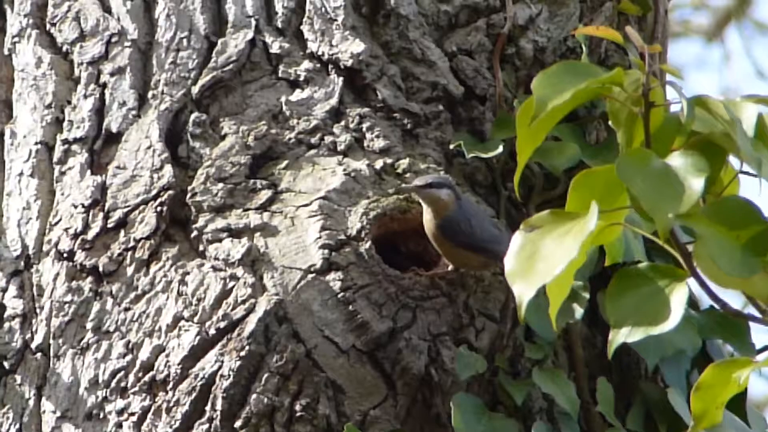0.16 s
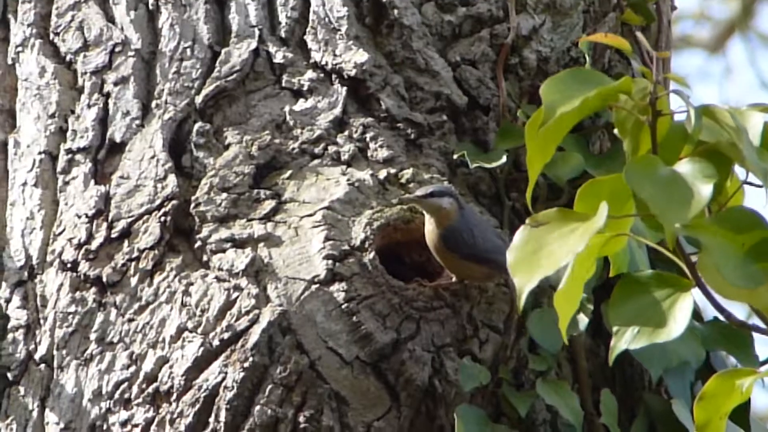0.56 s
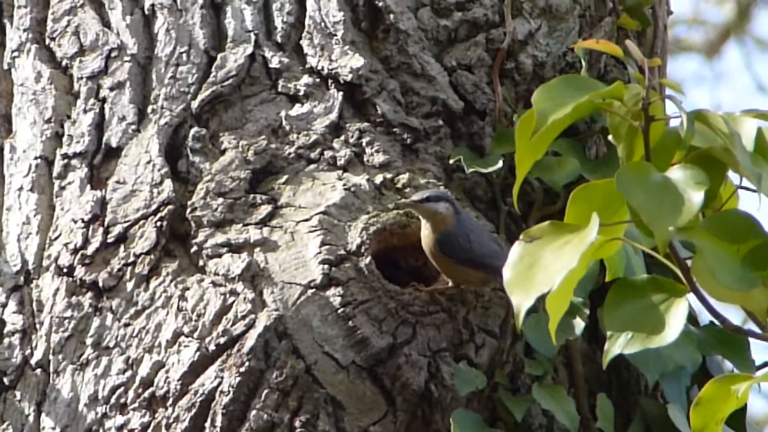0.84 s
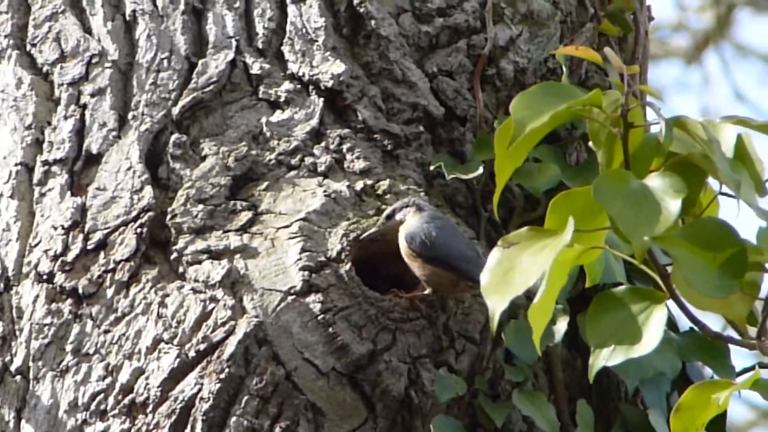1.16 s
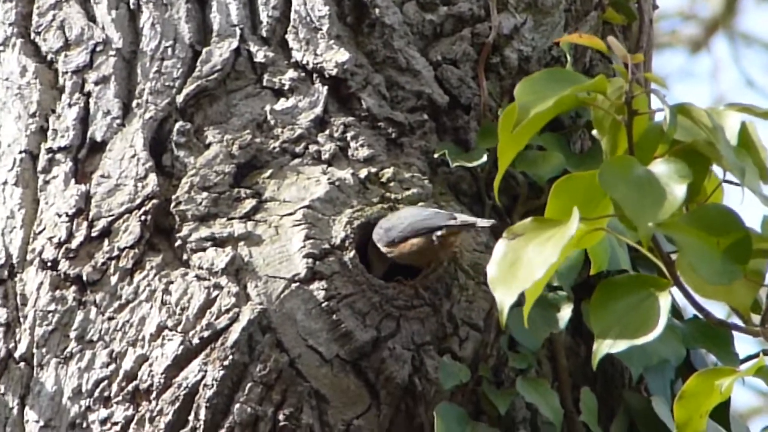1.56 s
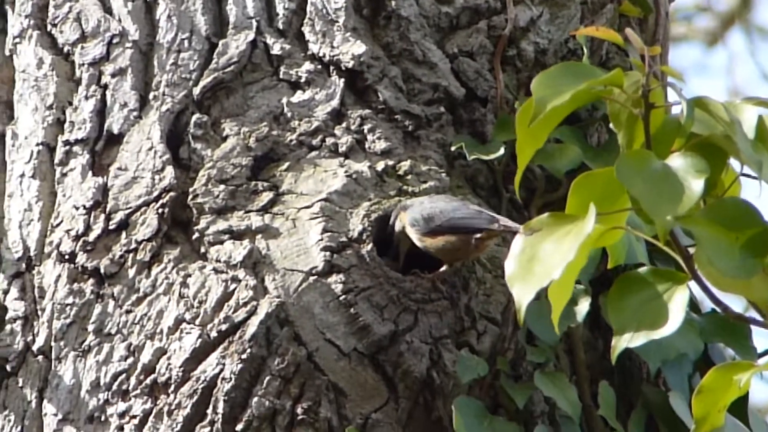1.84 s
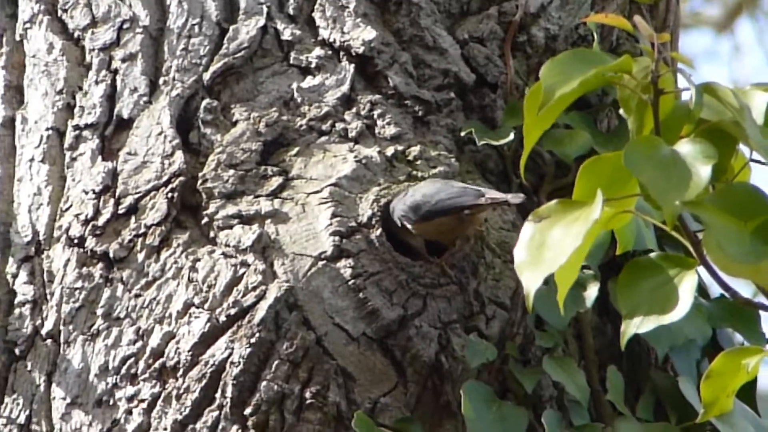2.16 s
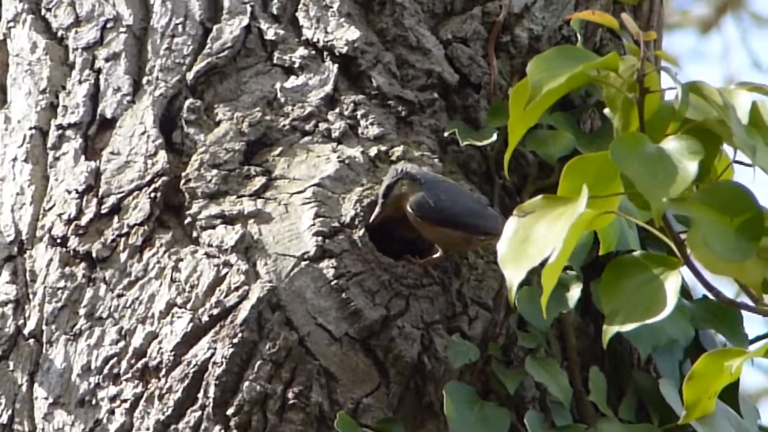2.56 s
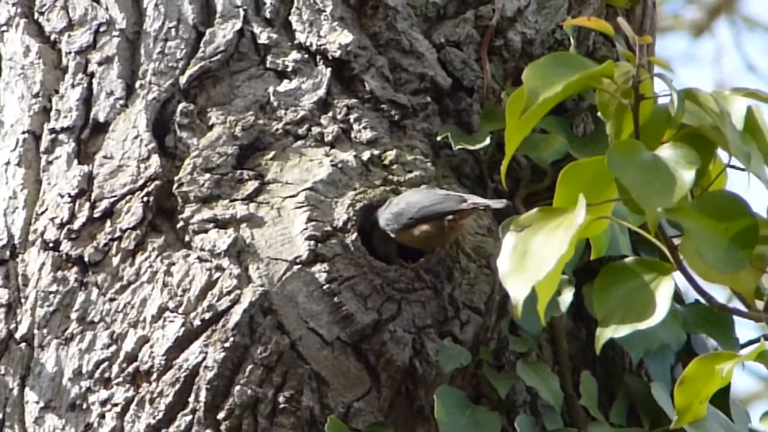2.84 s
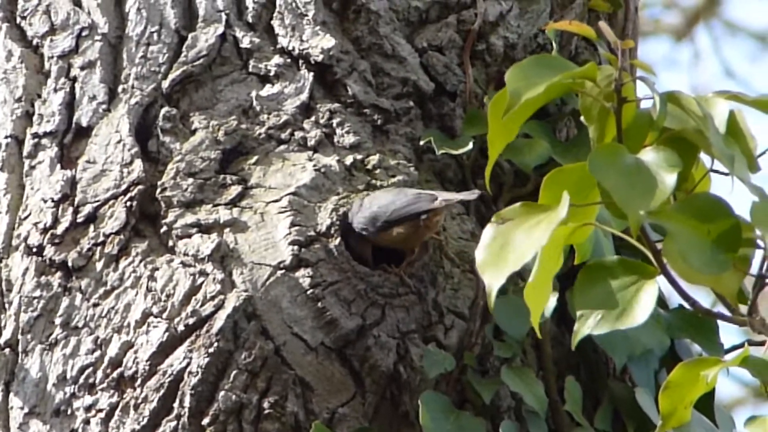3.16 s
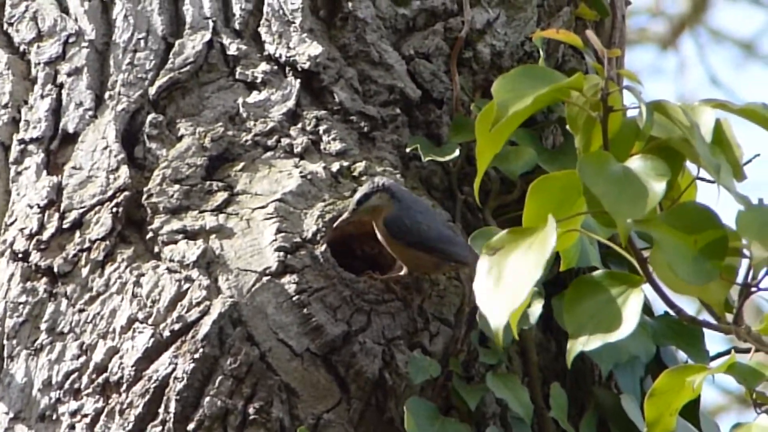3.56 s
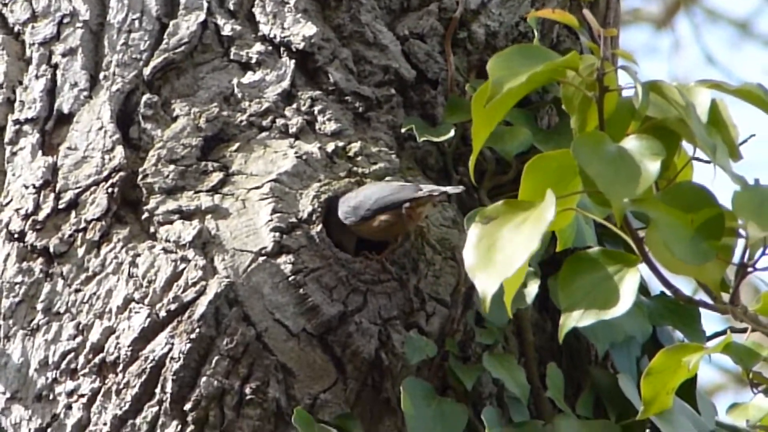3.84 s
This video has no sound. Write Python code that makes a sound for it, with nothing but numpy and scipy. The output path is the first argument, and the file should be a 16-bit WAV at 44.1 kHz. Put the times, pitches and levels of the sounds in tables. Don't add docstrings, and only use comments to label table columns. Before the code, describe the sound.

A small bird whistles clear repeated chirps among trees over steady distant road drone.

```python
import sys
import numpy as np
from scipy import signal
from scipy.fft import rfft, irfft, next_fast_len
from scipy.io import wavfile
from scipy.ndimage import uniform_filter1d, map_coordinates

SR = 44100
rng = np.random.default_rng(int(sys.argv[2]) if len(sys.argv) > 2 else 0)


def transcribe(u):
    v = np.clip(np.atleast_2d(u).T, -1, 1)
    q = np.round(v * 32767).astype(np.int16)
    wavfile.write(sys.argv[1], SR, q)


def invert_db(x):
    u = np.asarray(x, float) / 20
    return 10 ** u


N = 176400

# frequency in Hz, density in dB per Hz.
ENGINE_SPECTRUM = [(25, -58), (60, -27.5), (98, -11.5), (230, -9), (400, -3), (620, -10.5), (900, -7.5),
                   (1500, -120)]
TYRE_SPECTRUM = [(410, -24), (700, -4.5), (949, 4), (1070, -0.5), (1260, 1.5), (1780, 0), (2370, -5),
                 (2550, -11), (3000, -22.5), (3900, -19), (6600, -120)]
LEAF_SPECTRUM = [(1650, -32), (2800, -9.5), (3950, -1.5), (4830, -4), (5690, -9), (6620, -9),
                 (11000, -10.5), (14500, -27), (15500, -39)]
WIND_SPECTRUM = [(20, -22), (40, -12), (80, -2), (150, 0), (230, -27), (400, -120)]
# time in seconds, road level in dB, engines over it in dB.
ROAD_SWELL = [(.3, -32.5, 3), (.7, -32.5, 0), (1.3, -33.5, 2.5), (1.8, -33, 0.5), (2.3, -33.5, 1),
              (2.7, -34, 0), (3.1, -31, -1.5), (3.5, -33.5, 1.5), (4, -32, -1.5)]
# frequency in Hz, left over right in dB.
PORT_LEAN = [(40, 1), (110, 1.5), (200, 2.5), (380, 9), (700, 6), (2400, 4.5), (6000, 1.5), (15000, 1.6)]
# frequency in Hz, lead of the left in radians.
PORT_LEAD = [(40, 4), (130, 1.52), (260, 2.58), (500, 4.1), (860, 4.68), (2400, 7.26), (4000, 6.6),
             (15000, 5.55)]
# frequency in Hz, shared part from 0 to 1.
PORT_COHERENCE = [(30, .2), (60, .6), (150, .8), (300, .68), (600, .88), (2000, .85), (5000, .72),
                  (12000, .7)]

# start in seconds, level in dB.
TWIG_TICKS = [(2.3045, -20), (2.311, -25)]

# start in seconds, length in seconds, first Hz, last Hz, level in dB.
ANSWER_NOTES = [(3.418, .022, 6500, 4400, -32), (3.425, .075, 3500, 4150, -40),
                (3.538, .025, 6100, 3950, -29), (3.563, .039, 4020, 3900, -28),
                (3.576, .012, 4000, 3450, -33), (3.543, .02, 5620, 5540, -35),
                (3.602, .018, 5350, 4900, -31), (3.608, .024, 3750, 4020, -37),
                (3.643, .028, 4020, 3960, -35), (3.677, .045, 4300, 4280, -34),
                (3.735, .03, 4150, 4100, -40), (3.769, .031, 5300, 3720, -27),
                (3.786, .04, 4100, 3780, -30), (3.801, .018, 4050, 3350, -27),
                (3.819, .015, 3850, 3300, -30), (3.836, .02, 3950, 3800, -35),
                (3.885, .05, 4130, 4170, -33), (3.94, .02, 4100, 4000, -36), (3.962, .037, 4050, 4020, -36)]
# frequency in Hz, gain in dB.
FAR_PATH = [(3300, 0), (4000, 0), (4500, -5), (4950, -2), (5400, -4), (6500, -3)]
# delay in seconds, gain in dB.
TRUNK_ECHOES = [(.011, -10), (.024, -13), (.05, -16)]

# seconds from the note's time, pitch in Hz, effort in dB.
ARCH = [(-.026, 4300, -10), (-.011, 4620, -1), (0, 4950, 0), (.007, 5680, 0), (.015, 6100, -3),
        (.023, 5680, 0), (.033, 4890, 0), (.046, 4120, 1), (.054, 3800, -5)]
DROP = [(-.06, 5860, -13), (-.05, 5740, -7), (-.038, 5610, -1), (-.024, 5510, 4), (-.016, 5410, -7),
        (-.011, 5330, 7), (0, 4830, 0), (.012, 4100, -2), (.018, 3930, -14)]
FLICK = [(-.14, 5650, -10), (-.134, 5800, -11), (-.128, 6700, -12), (-.121, 7850, -9), (-.115, 7650, -2),
         (-.103, 7000, -2), (-.094, 6500, -12)]
HIGH = [(-.032, 8250, -12), (-.014, 8490, 0), (.002, 8570, 1), (.026, 8490, -2), (.045, 8330, -9),
        (.062, 8170, -7), (.082, 7740, 0), (.098, 7390, 0), (.106, 7330, -10)]
HOOK = [(-.008, 5100, -8), (-.002, 4950, -3), (.002, 4740, -1), (.01, 4120, -1), (.018, 3830, 1),
        (.024, 3670, -2), (.032, 3550, -3), (.055, 3540, -2), (.062, 3520, -10)]
LONG = [(-.032, 5550, -14), (-.022, 6020, -7), (0, 6230, -1), (.02, 6210, 0), (.05, 6200, -6),
        (.12, 6180, -13)]
SLIDE = [(-.068, 7650, -7), (-.062, 7520, -2), (-.047, 6960, -3), (-.027, 6210, -5), (-.017, 5730, 7),
         (-.012, 5490, 2), (-.002, 4920, 0), (.008, 4430, 0), (.017, 4020, -9)]
# note shape, time in seconds, strength in dB.
SONG = [(ARCH, .3375, 0), (ARCH, .5205, 0), (ARCH, .708, -1), (ARCH, .898, 1), (HIGH, 1.06, 0),
        (HOOK, 1.22, 0), (LONG, 1.36, 0), (SLIDE, 1.512, 0), (DROP, 1.706, 0), (DROP, 1.899, 0),
        (DROP, 2.089, 0), (DROP, 2.285, -1), (FLICK, 1.706, 0), (FLICK, 1.897, 0), (FLICK, 2.088, 0),
        (FLICK, 2.285, 0)]
# frequency in Hz, gain in dB.
RIGHT_RESPONSE = [(3550, -33), (3980, -22), (4330, -38), (4900, -17), (5280, -34), (5550, -25.5),
                  (6000, -36), (8500, -31)]
LEFT_RESPONSE = [(3550, -41), (3980, -30), (4330, -48), (4900, -29), (5280, -50), (5550, -40), (6050, -45),
                 (8500, -35)]


def unit(x):
    return x / np.sqrt(np.mean(x ** 2) + 1e-20)


def along(points, hz):
    f, value = np.transpose(points)
    return np.interp(np.log(hz + 1), np.log(f + 1), value)


def wobble(rate):
    knots = rng.standard_normal(int(N * rate / SR) + 4)
    return map_coordinates(knots, [np.arange(N) * rate / SR])


def filtered(x, response):
    m = next_fast_len(N + SR // 2)
    spectrum = rfft(x, m) * response(np.fft.rfftfreq(m, 1 / SR))
    return irfft(spectrum, m)[..., :N]


def rush(spectrum, patchy_db):
    z = signal.stft(rng.standard_normal((3, N)), nperseg=512)[2]
    patches = uniform_filter1d(rng.standard_normal(z.shape[1:]), size=6, axis=0)
    patches = uniform_filter1d(patches, size=12, axis=1)
    noise = signal.istft(z * invert_db(patchy_db * unit(patches)), nperseg=512)[1][:, :N]
    side = np.array([[.5], [-.5]])

    def colour(hz):
        return invert_db(along(spectrum, hz) + side * along(PORT_LEAN, hz))

    def coherence(hz):
        return np.clip(along(PORT_COHERENCE, hz), 0, 1)

    def shared_response(hz):
        return colour(hz) * np.sqrt(coherence(hz)) * np.exp(1j * side * along(PORT_LEAD, hz))

    shared = filtered(noise[0], shared_response)
    own = filtered(noise[1:], lambda hz: colour(hz) * np.sqrt(1 - coherence(hz)))
    return unit(shared + own)


def background():
    engines_db, tyres_db, leaves_db = -36.5, -31.5, -37
    s, road_db, engine_db = np.transpose(ROAD_SWELL)
    t = np.arange(N) / SR
    engine_level = invert_db(engines_db + np.interp(t, s, engine_db) + 0.42 * wobble(5.32))
    engines = engine_level * rush(ENGINE_SPECTRUM, patchy_db=1.0)
    tyres = invert_db(tyres_db + 0.25 * wobble(6.47)) * rush(TYRE_SPECTRUM, patchy_db=0.94)
    leaves = invert_db(leaves_db + 0.057 * wobble(2.74)) * rush(LEAF_SPECTRUM, patchy_db=0.75)
    swell = invert_db(np.interp(t, s, road_db - road_db.mean()))
    return swell * (engines + tyres) + leaves


def buffet():
    start_db, calms_db_per_s, lumps_db = -54, 9, 4
    t = np.arange(N) / SR
    low = unit(filtered(rng.standard_normal((2, N)), lambda hz: invert_db(along(WIND_SPECTRUM, hz))))
    return invert_db(start_db - calms_db_per_s * t + lumps_db * wobble(5.2)) * low


def twig():
    tick_hz, tick_t60, rise_s = 10300, .006, .00084
    line = np.zeros(N)
    t = np.arange(SR // 50) / SR
    ring = np.minimum(t / rise_s, 1) * np.sin(2 * np.pi * tick_hz * t)
    for s, db in TWIG_TICKS:
        line[round(s * SR):][:len(t)] += invert_db(db - 60 * t / tick_t60) * ring
    return line


def add_whistle(line, start_s, rows, quaver):
    edge_s = .0012
    s, hz, db = np.transpose(rows)
    t = s[0] + np.arange(int((s[-1] - s[0]) * SR)) / SR
    pitch = uniform_filter1d(np.interp(t, s, hz), size=130, mode="nearest")
    unrest = wobble(300)[round(start_s * SR / 2):][:len(t)]
    pitch = pitch * (1 + quaver * unrest)
    edge = np.clip(np.minimum(t - s[0], s[-1] - t) / edge_s, 0, 1)
    note = edge * invert_db(np.interp(t, s, db)) * np.sin(2 * np.pi * np.cumsum(pitch) / SR)
    seat = line[round((start_s + s[0]) * SR):][:len(t)]
    seat += note[:len(seat)]


def echoes(x, db):
    t60, gap_s = .38, .003
    t = np.arange(SR // 2) / SR
    tail = rng.standard_normal((2, len(t))) * invert_db(-60 * t / t60) * np.clip(t / gap_s, 0, 1)
    return invert_db(db) * signal.fftconvolve(x, tail / np.linalg.norm(tail[0]), axes=1)[:, :N]


def answer():
    bend_at, bend_share = .6, .7
    open_db, shake_db, quaver = -7, 2.5, .012
    line = np.zeros(N)
    for s, length, first_hz, last_hz, db in ANSWER_NOTES:
        opening_db = open_db * min(abs(first_hz - last_hz) / 1500, 1)
        bend_hz = first_hz + bend_share * (last_hz - first_hz)
        glide = [(0, first_hz, db + opening_db), (bend_at * length, bend_hz, db), (length, last_hz, db - 6)]
        add_whistle(line, s, glide, quaver)
    line = filtered(line * invert_db(shake_db * wobble(150)), lambda hz: invert_db(along(FAR_PATH, hz)))
    copies = sum(invert_db(db) * np.pad(line, (round(s * SR), 0))[:N] for s, db in TRUNK_ECHOES)
    heard = (line + copies)[None]
    pan = invert_db([[1], [-1]])
    return (heard + echoes(heard, -8.5)) * pan


def singer():
    flutter_db = 2
    line = np.zeros(N)
    for shape, s, db in SONG:
        add_whistle(line, s, np.array(shape) + [0, 0, db], quaver=.002)
    fluttering = line * invert_db(flutter_db * wobble(100))
    ports = filtered(fluttering, lambda hz: invert_db([along(LEFT_RESPONSE, hz), along(RIGHT_RESPONSE, hz)]))
    coloured_echoes = echoes(ports.mean(0, keepdims=True), -10)
    other_echoes = echoes(line[None], -38)
    return ports + coloured_echoes + other_echoes


def scene():
    return singer() + answer() + background() + buffet() + twig()


def top_cut(x):
    return signal.sosfilt(signal.butter(12, 15690, fs=SR, output="sos"), x)


def record(dry):
    start_s, fade_s, top_hz = .3165, .003, 15620
    thump_db, thump_s = -36, .004
    t = np.arange(N) / SR - start_s
    thump = invert_db(thump_db) * np.exp(-np.abs(t) / thump_s)
    limited = filtered(dry, lambda hz: hz < top_hz)
    mix = (limited + thump) * np.clip(t / fade_s, 0, 1)
    return top_cut(mix)


dry = scene()
out = record(dry)
transcribe(out)
```